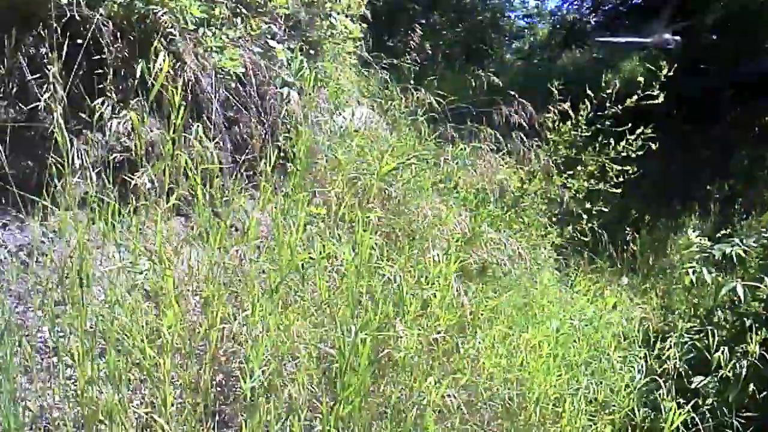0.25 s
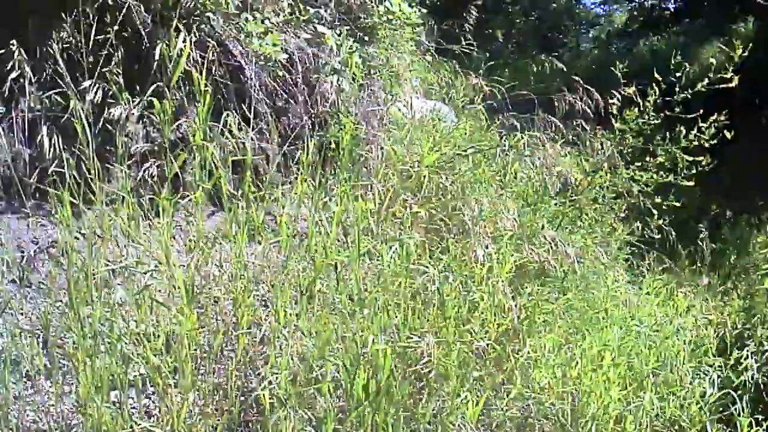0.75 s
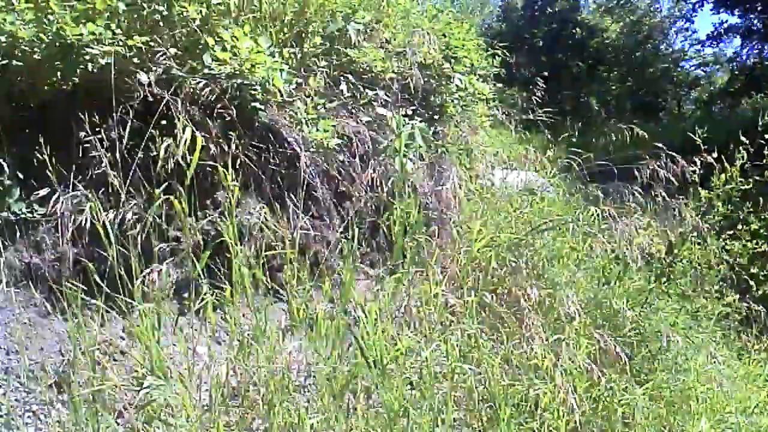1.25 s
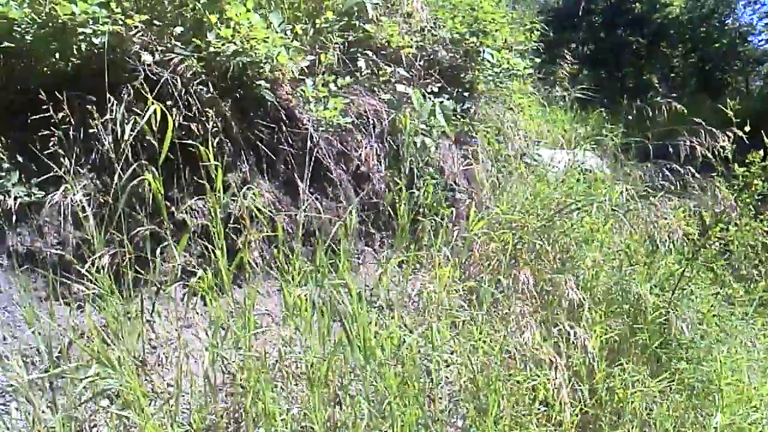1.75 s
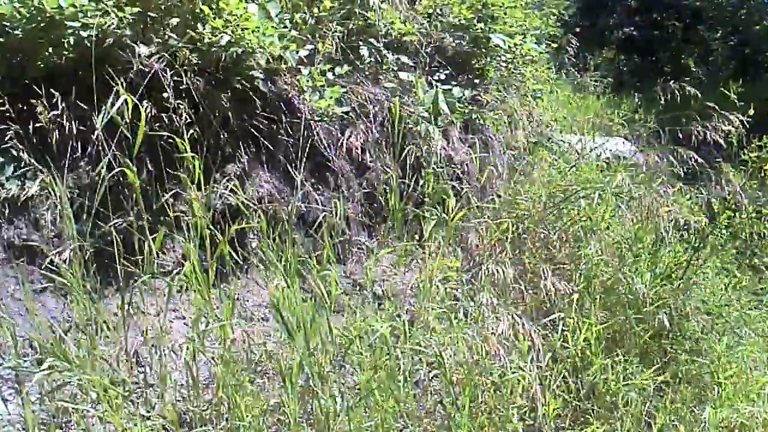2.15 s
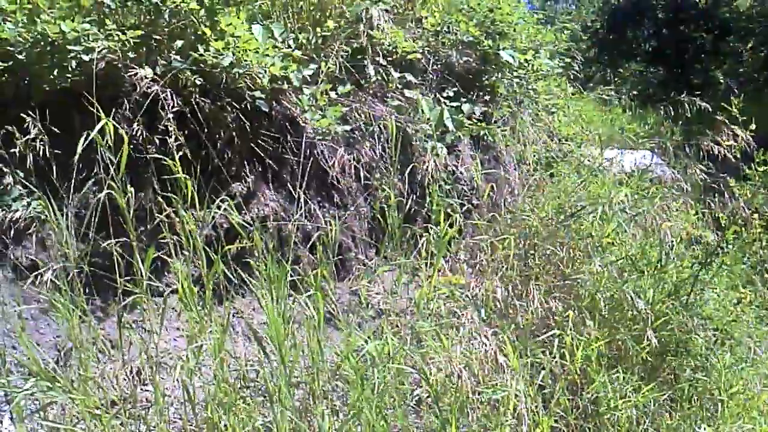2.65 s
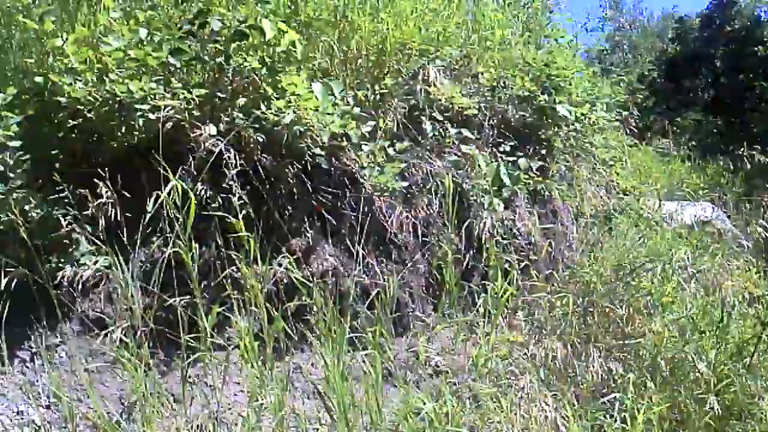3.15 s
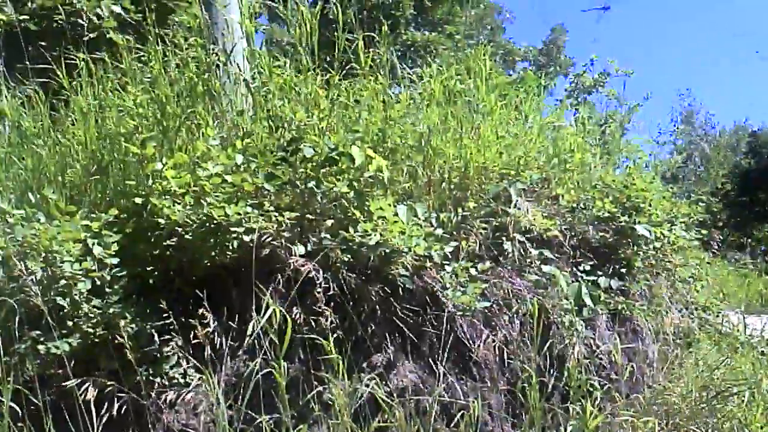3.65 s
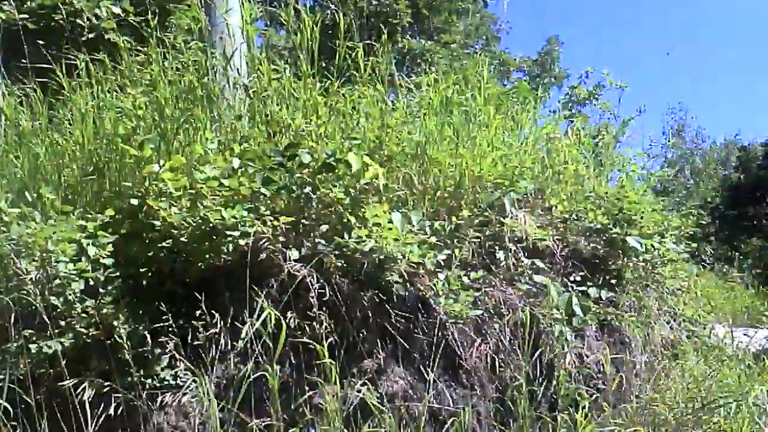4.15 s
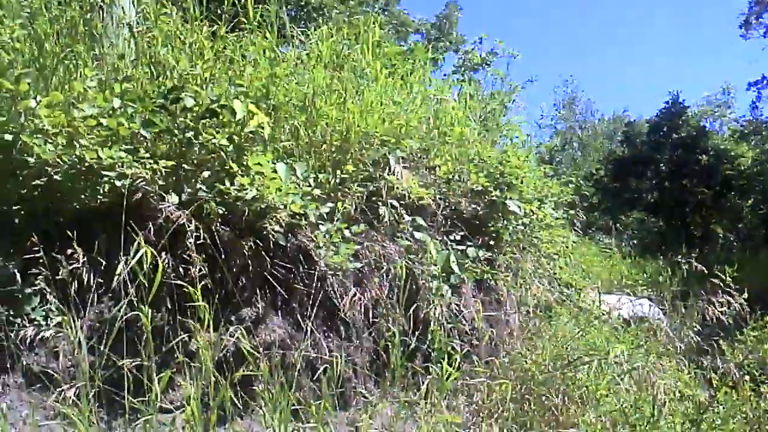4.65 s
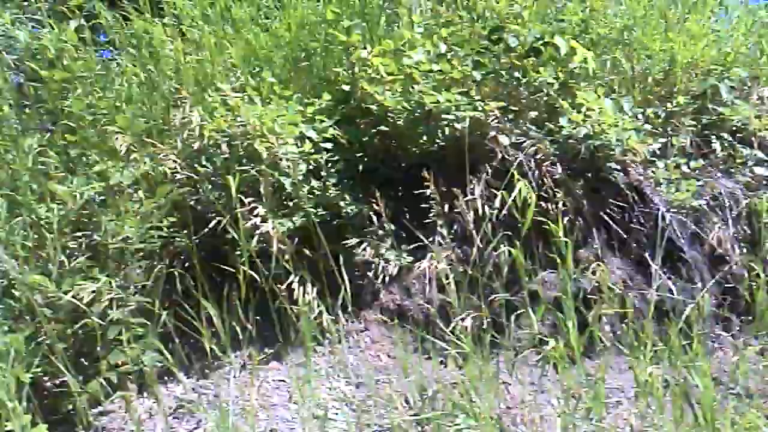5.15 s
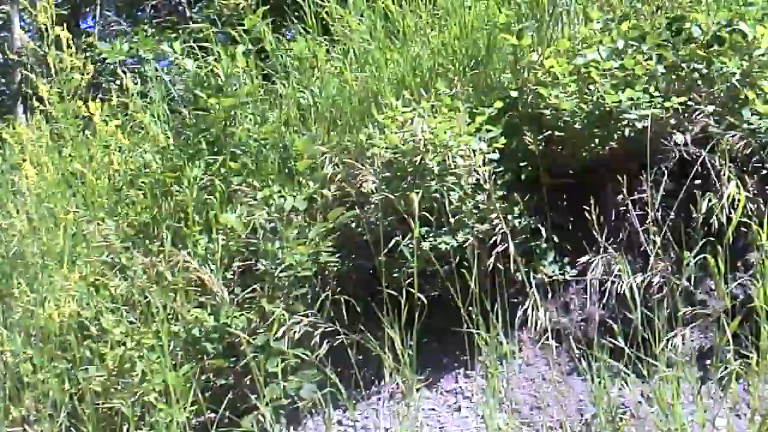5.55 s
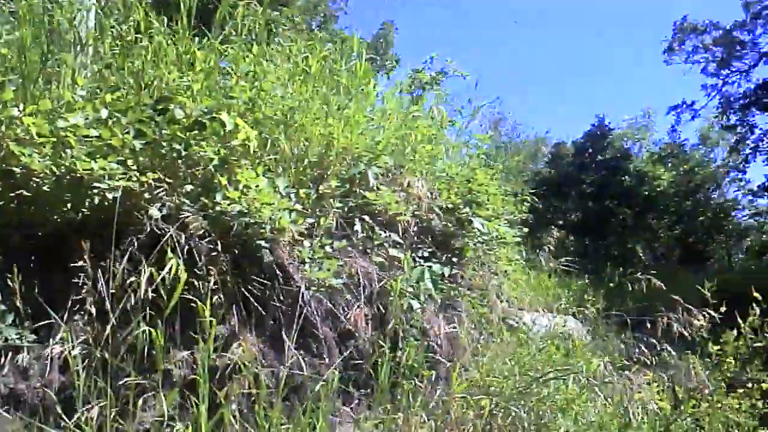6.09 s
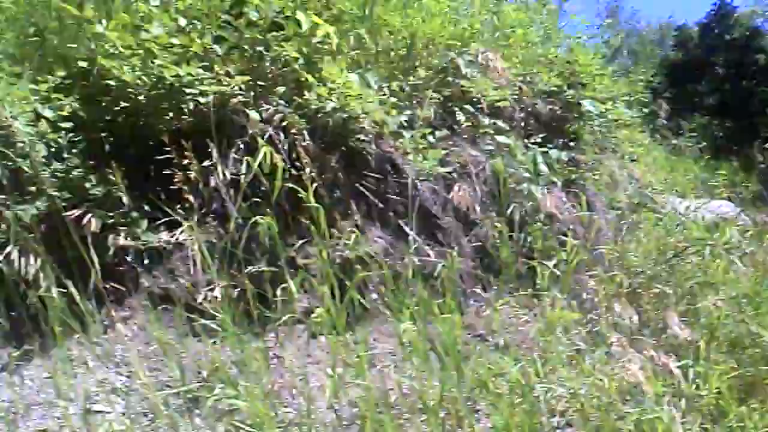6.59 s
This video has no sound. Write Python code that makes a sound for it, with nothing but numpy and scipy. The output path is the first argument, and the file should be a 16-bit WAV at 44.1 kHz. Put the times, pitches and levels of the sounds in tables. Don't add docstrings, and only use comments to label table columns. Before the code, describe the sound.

Outdoors on a sunny overgrown slope, someone moves slowly through dry grass. Crisp crackles and brushing dominate early, peaking around one and a half seconds, then fade to light ticks. A hoarse little bird twitters among the trees and another answers. A far engine hums steadily underneath. Wind buffets the handheld, almost mono microphone, growing stronger after five seconds and ending in a big low burst.

```python
import sys
import numpy as np
from scipy import signal
from scipy.fft import rfft, irfft, next_fast_len
from scipy.io import wavfile
from scipy.ndimage import uniform_filter1d, map_coordinates

SR = 44100
rng = np.random.default_rng(int(sys.argv[2]) if len(sys.argv) > 2 else 0)


def elevation(decibels):
    levels = np.asarray(decibels, float)
    return 10 ** (levels / 20)


def put_to_file(sound):
    columns = np.atleast_2d(sound).T
    safe = np.clip(columns, -1, 1)
    whole_steps = np.round(safe * 32767)
    wavfile.write(sys.argv[1], SR, whole_steps.astype(np.int16))


N = 300850

# start_s, pitch_hz, level_db
ENGINE_LOW = [(0, 58.6, -46), (2, 58.48, -48), (4, 58.57, -49.5), (5.5, 58.43, -47), (6.82, 58.5, -47)]
# start_s, pitch_hz, level_db
ENGINE_SECOND = [(0.0, 109.5, -54.5), (0.44, 112.7, -49.5), (0.9, 109.6, -72.5), (0.96, 111.4, -59),
                 (1.27, 108.3, -66), (1.63, 111, -55), (3.31, 111, -51), (3.9, 112.2, -72),
                 (3.99, 110.9, -52.5), (4.34, 110.1, -67), (5.09, 112, -50), (5.48, 112.3, -59),
                 (6.5, 112.4, -54)]
# pitch_hz, level_db
ENGINE_TONES = [(130, -59), (157, -63), (210, -64.5), (226, -65), (285, -71.5), (334, -69), (468, -69),
                (823, -74.5), (1468, -76)]
# pitch_hz, level_db (per Hz)
DISTANCE_COLOUR = [(24, -15), (40, 3), (71, -5), (226, -17), (269, -19), (479, -18), (2000, -37.5),
                   (3560, -34), (8770, -41), (14800, -46), (16000, -47)]

# start_s, length_s, start_hz, end_hz, level_db
LOOSE_NOTES = [(0.287, .033, 4300, 3100, -65.5), (0.373, .04, 2900, 4000, -63),
               (.655, .037, 1990, 2000, -63), (0.885, .052, 6700, 6700, -65), (1.004, .03, 5900, 6300, -56),
               (1.12, .03, 5700, 6400, -61), (1.22, .065, 5850, 5800, -63), (2.478, .022, 3350, 3250, -68),
               (2.5, .024, 3300, 3500, -63), (2.523, .02, 3200, 2750, -69), (2.615, .035, 2650, 3500, -67),
               (2.65, .035, 3500, 2350, -70), (3.31, .068, 4100, 2840, -69), (3.36, .056, 6080, 6900, -71),
               (3.48, .022, 3200, 3700, -63), (3.5, .027, 2950, 2820, -65), (3.897, .028, 6100, 6550, -62),
               (3.653, .014, 4850, 5120, -63), (3.667, .025, 5120, 5100, -58.5),
               (3.692, .045, 5100, 5040, -63.5), (3.806, .025, 4700, 5000, -60),
               (3.831, .045, 5000, 4800, -62), (3.582, .014, 4100, 4700, -66),
               (3.742, .012, 4400, 4700, -66), (3.91, .02, 6300, 4700, -68), (4.07, .057, 3750, 4250, -71),
               (4.44, .04, 5850, 5000, -69), (4.479, .077, 4950, 4880, -70), (4.57, .032, 6700, 6700, -70),
               (4.641, .06, 5200, 4830, -67), (5.42, .06, 1800, 1800, -72), (5.66, .049, 1820, 1820, -70)]
# start_s, length_s, start_hz, end_hz, level_db
ANSWER_NOTES = [(4.93, .04, 3550, 4070, -67), (5.02, .051, 3600, 2420, -63), (5.146, .035, 2300, 3400, -64),
                (5.176, .075, 3250, 3020, -63), (5.303, .022, 4700, 3300, -61),
                (5.385, .035, 3100, 4200, -66), (5.448, .018, 5600, 5840, -61),
                (5.533, .038, 4200, 3350, -62.5), (5.975, .04, 2900, 4400, -72),
                (6.014, .07, 4600, 3970, -68), (6.178, .035, 2500, 3700, -67),
                (6.208, .028, 3600, 3700, -65), (6.236, .025, 3600, 2700, -65),
                (6.29, .05, 3100, 2500, -74)]
# start_s (into the figure), length_s, start_hz, end_hz, level_db (added)
FIGURE_NOTES = [
    (0, .018, 4900, 4260, 2),
    (.035, .053, 5850, 3520, -2),
    (.088, .028, 3420, 4150, -5),
    (.112, .022, 4150, 4250, -4.5),
]
FALL_NOTE = [
    (0, .05, 4650, 3070, -2.5),
]
# start_s, level_db
FIGURE_TIMES = [(2.757, -60), (2.958, -57), (3.17, -57.5)]
# start_s, level_db
FALL_TIMES = [(3.59, -60), (3.748, -60.5), (3.918, -60.5)]
# start_s, length_s, start_hz, end_hz, level_db
HOOKED_NOTES = [(3.411, .036, 5800, 5450, -60), (3.52, .045, 6600, 5570, -62)]

# peak_s, level_db, rise_s (per 10 dB), fall_s (per 10 dB)
WIND_GUSTS = [(0.1, -46, .1, .2), (0.56, -42, .25, .1), (0.74, -41, .04, .2), (0.93, -39, .2, .1),
              (1.2, -43, .15, .3), (1.7, -45, .1, .1), (2.22, -47, .06, .2), (2.7, -51, .1, .3),
              (3.52, -46, .08, .08), (4.3, -45, .2, .5), (5.22, -35, .08, .1), (5.36, -36, .1, .04),
              (5.47, -38, .15, .1), (5.77, -39, .4, .12), (5.95, -40, .06, .3), (6.36, -36, .06, .03),
              (6.81, -20, .09, .12)]
# peak_s, level_db, pitch_hz, width_cycles
AIR_PUSHES = [(5.142, -33, 40, .35), (5.216, -28, 32, .45), (5.249, -26.5, 28, .45), (5.284, -32, 32, .39),
              (5.333, -34, 40, .35), (5.468, -29, 30, .4), (5.73, -26, 60, .42), (5.775, -31, 45, .4),
              (6.756, -20, 45, .35), (6.77, -21, 45, .35), (6.791, -18, 38, .45), (6.81, -11, 50, .5)]
# peak_s, level_db, pitch_hz, width_cycles
AIR_PULLS = [(5.154, -27, 35, .35), (5.274, -30, 50, .35), (5.346, -28, 25, .35), (5.458, -27, 55, .35),
             (6.747, -18, 30, .3), (6.821, -16, 30, .3)]
# pitch_hz, level_db (per Hz)
RUMBLE_COLOUR = [(6, -9), (16, 1.5), (26, 1), (40, -10), (70, -13.5), (120, -28), (250, -43), (600, -62)]
# pitch_hz, level_db (per Hz)
ROAR_COLOUR = [(60, -16), (130, 3), (250, -10), (500, -19), (1500, -33), (3000, -49)]

# start_s, level_db, pitch_hz
MIDDLE_FLICKS = [(2.7539, -49, 10200), (2.7958, -46, 9370), (2.9035, -52, 10400), (2.9165, -46, 10000),
                 (2.9434, -46, 9110), (3.142, -49, 9570), (3.1904, -52, 10200), (3.2138, -50, 7750),
                 (3.2457, -50, 8650), (3.2632, -44, 9820), (3.2832, -52, 7870), (3.3335, -53, 9900),
                 (3.374, -52, 7030), (3.4174, -53, 7060), (3.4353, -46, 7540), (3.5196, -52, 7120),
                 (3.5411, -50, 7960), (3.578, -49, 7110), (3.6379, -52, 11800), (3.7187, -51, 9720),
                 (3.7576, -48, 7550), (3.815, -55, 9150), (3.8344, -51, 8580), (3.9447, -55, 7070),
                 (3.9691, -47, 9920), (4.0, -52, 9150), (4.0739, -49, 8450), (4.1008, -48, 9280)]
# start_s, level_db, pitch_hz
LAST_FLICKS = [(4.3151, -42, 6520), (4.4867, -53, 9680), (4.5014, -51, 6520), (4.581, -48, 6690),
               (4.7192, -40, 9670), (4.8654, -41, 8830), (4.9574, -45, 9020), (5.0115, -46, 8990),
               (5.214, -41, 9750), (5.2455, -37, 10700), (5.2894, -42, 9380), (5.3094, -42, 10700),
               (5.4026, -46, 10000), (5.441, -41, 9870), (5.5677, -47, 7990), (5.6436, -50, 6830),
               (5.7004, -35, 7080), (5.7374, -33, 7580), (5.7887, -36, 8230), (5.7944, -35, 6720),
               (5.8292, -30, 7040), (5.8905, -35, 7220), (5.9194, -44, 7180), (6.4574, -51, 11200),
               (6.4862, -47, 11000), (6.5585, -40, 8510), (6.6164, -47, 9550), (6.6697, -39, 7700)]
# start_s, level_db, pitch_hz
FIRST_FLICKS = [(0.3431, -48, 6570), (0.5384, -40, 7760), (1.4154, -28, 12600), (1.4954, -28, 8780),
                (1.5094, -28, 8900), (1.5624, -31, 7050), (1.5923, -29, 6880), (1.6064, -27, 9250),
                (1.6374, -32, 8540), (1.6791, -27, 11000), (1.8034, -37, 6620), (1.8821, -33, 6960),
                (1.9126, -33, 6720), (1.9764, -30, 7290), (2.145, -37, 10300), (2.1824, -34, 8040),
                (2.2263, -37, 9570), (2.2578, -37, 6510), (2.3461, -39, 9850), (2.4294, -44, 6590),
                (2.4573, -36, 6500), (2.4734, -38, 6960), (2.5374, -43, 6530), (2.8424, -47, 9490),
                (2.8564, -48, 9990), (2.9304, -46, 9550)]
# peak_s, level_db, rise_s (per 10 dB), fall_s (per 10 dB)
SEED_SWEEPS = [(.1, -58, .1, .1), (.76, -50, .04, .15), (2.38, -60, .3, .1), (2.85, -68, .12, .1),
               (4.17, -66, .15, .15), (5.27, -57, .1, .25), (6.76, -57, .01, .04), (6.81, -49, .015, .05)]
# pitch_hz, level_db (per Hz)
SEED_COLOUR = [(5500, -30), (8000, -5), (9700, 0), (11500, -4), (15500, -9), (17000, -30)]

# start_s, level_db (peak), knock_db (relative to the crack), pitch_hz
STEM_SNAPS = [(0.041, -26.5, -23, 5380), (0.1804, -35.5, -1, 3450), (0.6419, -38, -14, 5000),
              (0.842, -21, -28, 9370), (0.849, -25, -30, 8050), (0.9, -30, -15, 6630),
              (1.211, -41, -5, 5000), (1.2233, -33, -9, 5940), (1.2491, -31, -16, 5800),
              (1.296, -25, -25, 5100), (1.315, -27, -28, 5910), (1.4462, -29, -17, 6300),
              (1.479, -12, -14, 8800), (1.5416, -22, -33, 7600), (1.7304, -29, -35.5, 6440),
              (2.021, -38, -9, 5000), (2.0694, -36.5, -7, 7030), (2.1247, -38, -10, 7190),
              (2.9194, -47, -8, 4220), (3.7584, -43.5, -12, 4300), (3.969, -42.5, -13, 3570),
              (4.118, -43, -12, 9280), (4.1819, -28.5, -12, 6500), (4.2386, -41, -13, 5660),
              (4.3991, -50, -4, 5030), (5.1412, -41, -7, 6620), (5.7246, -28, -25, 5580),
              (5.8475, -22.5, -38, 4120), (6.012, -37.5, -20, 4440), (6.7476, -31, -22, 11500)]
# start_s, level_db (peak)
BLADE_CRACKS = [(0.1263, -31), (0.4399, -41), (0.503, -41), (0.5521, -38.5), (0.5985, -41), (0.6906, -30),
                (1.029, -37), (1.3884, -32), (1.4053, -28), (1.4306, -28), (1.546, -29), (1.5505, -29),
                (1.8632, -34), (1.895, -32), (1.942, -29), (2.0093, -27), (2.0926, -34), (2.207, -33),
                (2.2912, -35), (2.383, -37), (2.465, -34), (2.5237, -39), (0.926, -38), (4.333, -40),
                (4.8299, -31), (5.8112, -32), (5.877, -37), (6.571, -41), (6.6887, -38), (6.8028, -35)]

# peak_s, level_db, rise_s (per 10 dB), fall_s (per 10 dB)
LEG_SWEEPS = [(0.0, -45.5, .05, .17), (0.554, -55, .02, .016), (0.718, -37, .022, .17),
              (0.845, -43, .12, .075), (1.02, -57, .05, .12), (1.27, -49.5, .13, .4),
              (1.438, -42, .07, .04), (1.5, -41.5, .05, .22), (1.71, -50, .2, .03), (1.97, -47, .25, .12),
              (2.17, -54, .08, .25), (2.47, -56, .5, .025), (2.525, -59, .01, .03), (2.8, -60.5, .09, .17),
              (3.5, -68, .5, .25), (4.17, -59, .18, .2), (4.31, -65, .15, .06), (4.56, -66, .12, .05),
              (4.77, -53, .035, .1), (4.83, -50, .06, .12), (4.94, -60, .1, .02), (5.27, -58, .3, .35),
              (5.72, -52, .025, .08), (5.84, -45.5, .09, .045), (5.9, -51, .05, .02), (6.02, -64, .02, .03),
              (6.5, -68, .9, .3), (6.7, -50.5, .07, .06), (6.76, -50, .03, .025), (6.815, -50, .012, .05)]
# peak_s, level_db, rise_s (per 10 dB), fall_s (per 10 dB)
FOOTSTEPS = [(0.0, -50.5, .05, .2), (0.73, -47, .045, .15), (0.86, -52, .1, .05), (1.22, -53, .03, .3),
             (1.45, -48, .12, .25), (2.0, -57, .4, .05), (2.12, -59, .06, .2), (3.6, -65, .3, .2),
             (4.22, -64, .2, .2), (4.83, -55, .1, .2), (5.16, -59, .2, .8), (5.89, -60, .3, .1),
             (6.03, -63, .03, .1), (6.7, -60, .2, .1), (6.82, -52, .025, .05)]
# pitch_hz, level_db (per Hz)
BLADE_COLOUR = [(1200, -21), (2500, -9), (4500, -6), (6800, .8), (9000, -.5), (12000, .3), (15500, -3),
                (17000, -30.5)]
# pitch_hz, level_db (per Hz)
CRUNCH_COLOUR = [(120, -32), (250, 1), (600, -1), (1200, -0.5), (2200, -4), (3500, -13.5), (6000, -5)]

# pitch_hz, level_db (per Hz)
HISS_COLOUR = [(60, -30), (200, 2.5), (500, 7.5), (1200, -0.5), (3000, -47), (8000, 3), (16000, -1)]


def unit(x):
    return x / np.sqrt(np.mean(x ** 2) + 1e-20)


def curves(rows):
    s, *columns = np.transpose(rows)
    return [np.interp(np.arange(N) / SR, s, column) for column in columns]


def wobble(rate):
    coarse = np.arange(0, N + 64, 64)
    knots = rng.standard_normal(int(N * rate / SR) + 4)
    return np.interp(np.arange(N), coarse, map_coordinates(knots, [coarse * rate / SR]))


def swells(rows, rest_db):
    t = np.arange(0, N + 64, 64) / SR
    s, db, rise_s, fall_s = np.transpose(rows)[:, :, None]
    away = np.where(t < s, (s - t) / rise_s, (t - s) / fall_s)
    power = elevation(2 * rest_db) + elevation(2 * db - 20 * away).sum(axis=0)
    return np.interp(np.arange(N) / SR, t, 10 * np.log10(power))


def coloured(x, points):
    size = next_fast_len(N + 8192)
    f, db = np.transpose(points)
    bins = np.log(np.fft.rfftfreq(size, 1 / SR) + 1)
    gain = elevation(np.interp(bins, np.log(f + 1), db, -120, -120))
    return unit(irfft(rfft(x, size) * gain, size)[:N])


def patchy(depth_db):
    z = signal.stft(rng.standard_normal(N), nperseg=512)[2]
    patches = uniform_filter1d(rng.standard_normal(z.shape), size=12, axis=0)
    patches = uniform_filter1d(patches, size=6, axis=1)
    return signal.istft(z * elevation(depth_db * unit(patches)), nperseg=512)[1][:N]


def grains(count, pitch_hz, cycles, spread_db):
    start = rng.integers(0, N, count)[:, None]
    hz = np.clip(pitch_hz * np.exp(.5 * rng.standard_normal((count, 1))), 200, 17000)
    size = elevation(spread_db * np.minimum(rng.exponential(size=(count, 1)), 3.2))
    size = size * rng.choice([-1, 1], (count, 1))
    step = np.arange(48)
    tick = size * np.sin(2 * np.pi * hz * step / SR) * np.exp(-step * hz / (cycles * SR))
    return unit(np.bincount((start + step).ravel(), tick.ravel(), N + len(step))[:N])


def engine():
    t = np.arange(N) / SR
    tones = np.zeros(N)
    for hz, db in map(curves, (ENGINE_LOW, ENGINE_SECOND)):
        level = elevation(db + 3 + 1.46 * wobble(15))
        tones += level * np.sin(2 * np.pi * np.cumsum(hz) / SR + .45 * wobble(12))
    for hz, db in ENGINE_TONES:
        level = elevation(db + 2.5 + 1.33 * wobble(5))
        tones += level * np.sin(2 * np.pi * hz * t + 0.073 * np.sqrt(hz) * wobble(8))
    wash = elevation(-49 + .5 * wobble(1.19)) * coloured(patchy(depth_db=1.9), DISTANCE_COLOUR)
    return tones + wash


def glide(rows, fall_share):
    return [(*row, fall_share if row[3] < row[2] else .58) for row in rows]


def bird(song, rough, wet_db):
    out = np.zeros(N + SR, complex)
    for s, length, start_hz, end_hz, db, half in song:
        u = np.linspace(0, 1, int(length * SR))
        middle_hz = start_hz + half * (end_hz - start_hz)
        hz = np.polyval(np.polyfit([0, .5, 1], [start_hz, middle_hz, end_hz], 2), u)
        level = elevation(db + 4.3) * np.sin(np.pi * u) ** 0.28
        out[round(s * SR):][:len(u)] += level * np.exp(2j * np.pi * np.cumsum(hz) / SR)
    hoarse = np.exp(1j * rough * wobble(250)) * elevation(2.3 * rough * wobble(120))
    whistle = (out[:N] * hoarse).real
    t = np.arange(SR // 2) / SR
    trees = rng.standard_normal(len(t)) * elevation(-60 * t / .36) * (1 - np.exp(-t / 0.0054))
    echo = signal.fftconvolve(whistle, trees / np.linalg.norm(trees))[:N]
    return whistle + elevation(wet_db) * echo


def birds():
    figures = []
    for notes, times in ((FIGURE_NOTES, FIGURE_TIMES), (FALL_NOTE, FALL_TIMES)):
        for s, db in times:
            for later_s, length, start_hz, end_hz, note_db in notes:
                figures.append((s + later_s, length, start_hz, end_hz, db + note_db))
    song = glide(figures + LOOSE_NOTES, .36) + glide(HOOKED_NOTES, .95)
    singer = bird(song, rough=.85, wet_db=2.8)
    return singer + bird(glide(ANSWER_NOTES, .36), rough=.75, wet_db=0.5)


def wind():
    gust_db = swells(WIND_GUSTS, rest_db=-60)
    lumps = elevation(2.5 * wobble(25))
    rumble = unit(lumps * coloured(rng.standard_normal(N), RUMBLE_COLOUR))
    roar = unit(lumps * coloured(rng.standard_normal(N), ROAR_COLOUR))
    out = np.hypot(elevation(gust_db - 2.5), elevation(-55)) * rumble
    out += elevation(2.1 * (gust_db + 24) - 38) * roar
    for sign, rows in ((1, AIR_PUSHES), (-1, AIR_PULLS)):
        for s, db, hz, cycles in rows:
            near = np.arange(round((s - .1) * SR), min(round((s + .1) * SR), N))
            turn = (near / SR - s) * hz
            out[near] += sign * elevation(db) * np.cos(2 * np.pi * turn) * np.exp(-(turn / cycles) ** 2)
    return out


def flicks():
    out, t = np.zeros(N + 600), np.arange(300) / SR
    rows = MIDDLE_FLICKS + LAST_FLICKS + FIRST_FLICKS
    for (s, db, hz), noise in zip(rows, rng.standard_normal((len(rows), len(t)))):
        rough = .7 + 1.1 * uniform_filter1d(noise, size=2)
        ring = rough * np.sin(2 * np.pi * hz * t) * elevation(-60 * t / .004)
        out[round((s + .0008) * SR):][:len(t)] += elevation(db + 3) * ring
    return out[:N]


def seed_heads():
    level = elevation(swells(SEED_SWEEPS, rest_db=-90) + 2.4 * wobble(120))
    return level * coloured(rng.standard_normal(N), SEED_COLOUR)


def snaps():
    out, t = np.zeros(N + 600), np.arange(400) / SR
    breaks = STEM_SNAPS + [(s, db, -23, 6200) for s, db in BLADE_CRACKS]
    for (s, db, knock_db, hz), noise in zip(breaks, rng.standard_normal((len(breaks), 2, len(t)))):
        crack = np.diff(noise[0], prepend=0) * .75 * elevation(-60 * t / .005)
        rough = 1.5 * uniform_filter1d(noise[1], size=5)
        ring = rough * np.sin(2 * np.pi * hz * t) * elevation(-60 * t / 0.0081)
        turn = 2 * np.pi * (1250 - 14 * (db + 37)) * t
        knock = (np.sin(turn) + .45 * np.sin(2.2 * turn)) * elevation(-60 * t / 0.0042)
        whole = crack + ring + elevation(knock_db + 11) * knock
        out[round((s + .0008) * SR):][:len(t)] += elevation(db - 0.2) * whole
    return out[:N]


def grass():
    swish_db = swells(LEG_SWEEPS, rest_db=-77)
    tread_db = swells(FOOTSTEPS, rest_db=-66)
    flutter = elevation(1.1 * wobble(80) + 2.4 * wobble(170))
    ticks = grains(count=16000, pitch_hz=10000, cycles=0.84, spread_db=5.1)
    blades = unit(flutter * coloured(patchy(depth_db=0.94) + .6 * ticks, BLADE_COLOUR))
    broad = uniform_filter1d(blades, size=4)
    swish = blades + (elevation(2.2) - 1) * broad
    crunch = coloured(patchy(depth_db=2.0) + 0.28 * ticks, CRUNCH_COLOUR)
    stray = coloured(grains(count=500, pitch_hz=11500, cycles=1.5, spread_db=4), BLADE_COLOUR)
    return elevation(-72) * stray + elevation(swish_db + 3.5) * swish + elevation(tread_db + 1.34) * crunch


def scene():
    background = engine() + birds() + wind()
    walk = flicks() + seed_heads() + snaps() + grass()
    return np.tile(background + walk, (2, 1))


def band_limit(x):
    return signal.sosfilt(signal.butter(12, 16680, fs=SR, output="sos"), x)


def record(dry):
    hiss = elevation(-69) * np.array([coloured(noise, HISS_COLOUR) for noise in rng.standard_normal((2, N))])
    left = np.append(0, dry[0, :-1])
    size = next_fast_len(N)
    spectrum = rfft(np.array([left, dry[1]]) + hiss, size)
    spectrum[:, np.fft.rfftfreq(size, 1 / SR) > 15960] *= elevation(-80)
    mix = irfft(spectrum, size)[:, :N]
    return band_limit(mix)


dry = scene()
out = record(dry)
put_to_file(out)
```